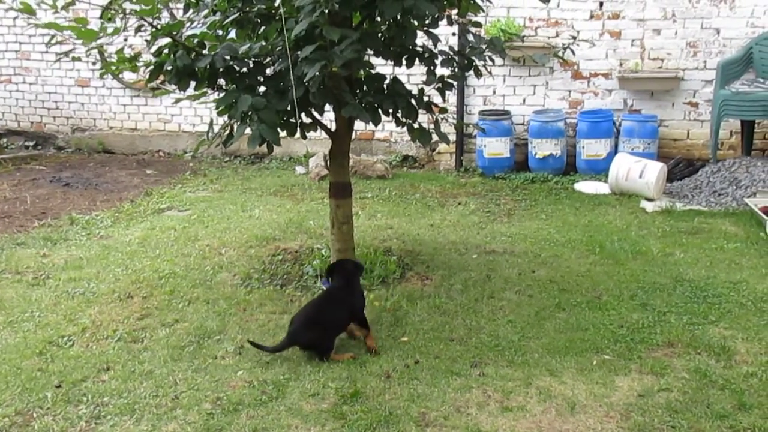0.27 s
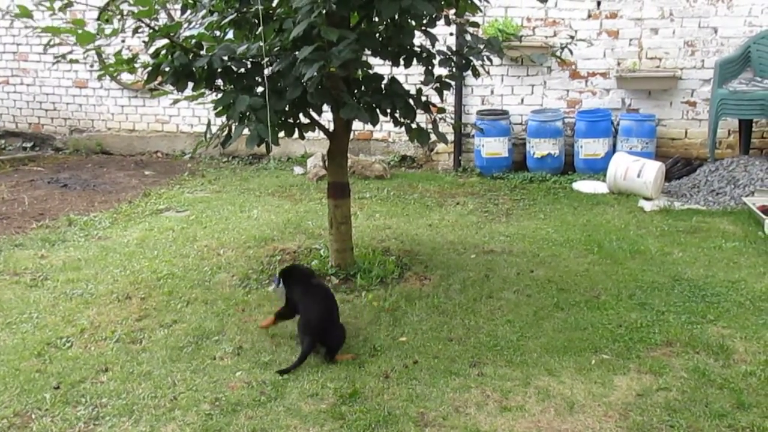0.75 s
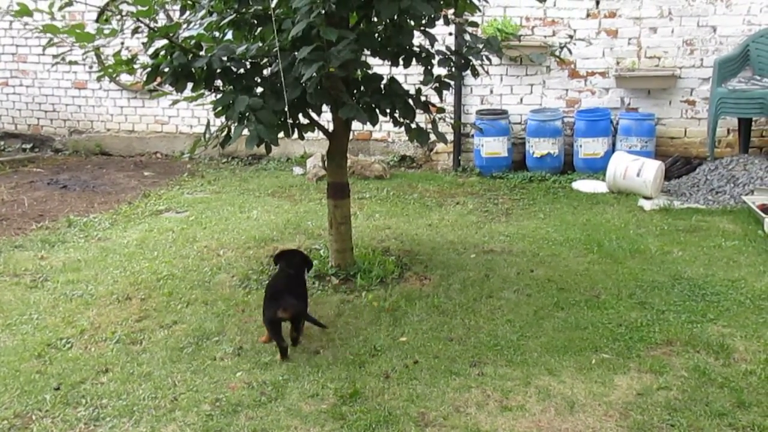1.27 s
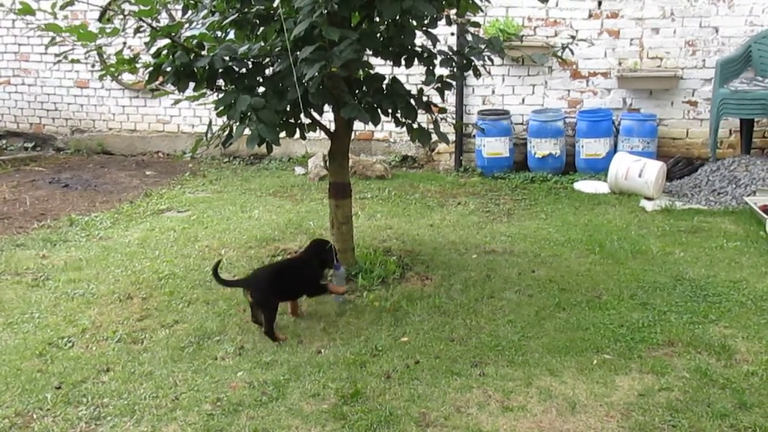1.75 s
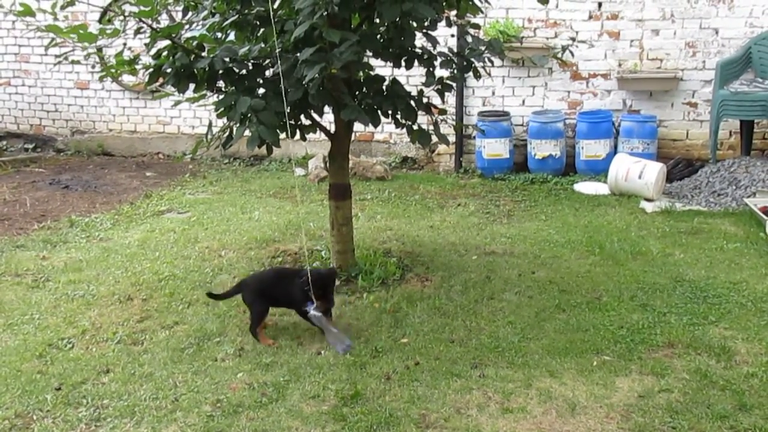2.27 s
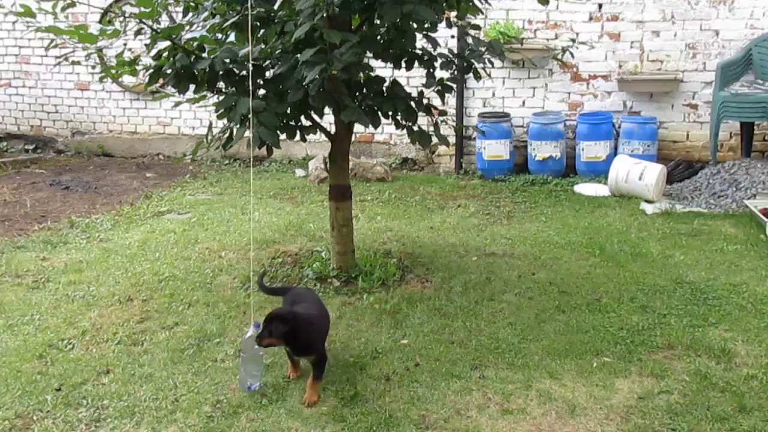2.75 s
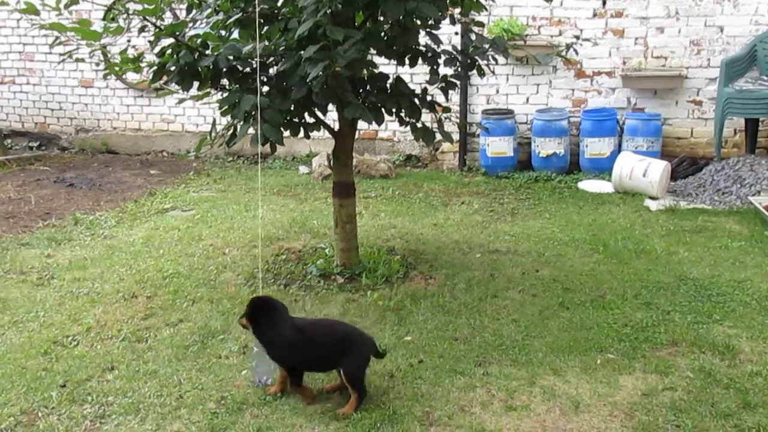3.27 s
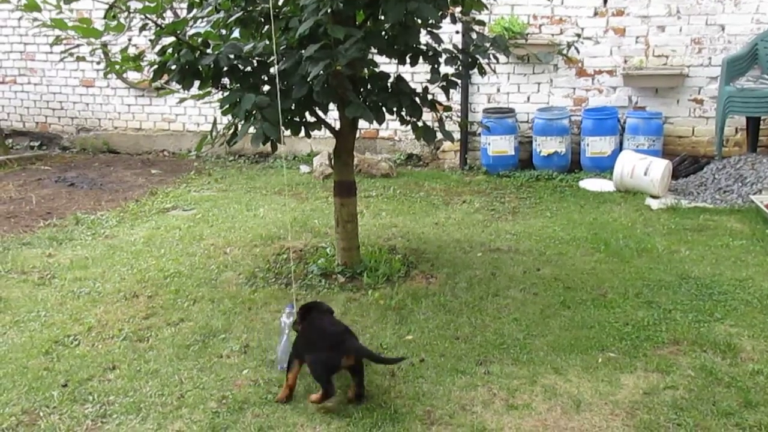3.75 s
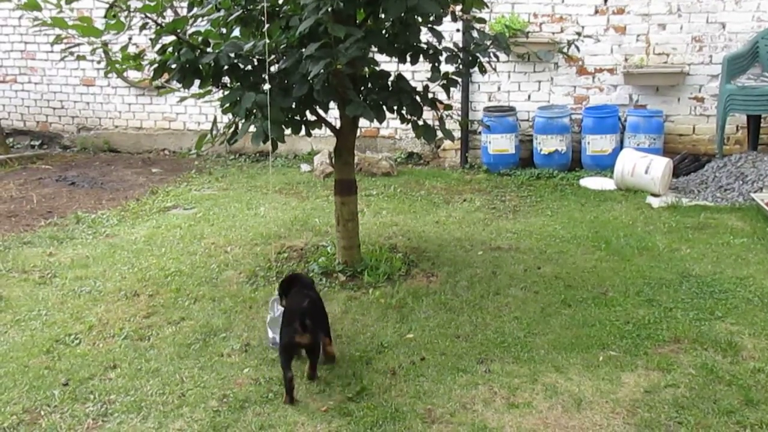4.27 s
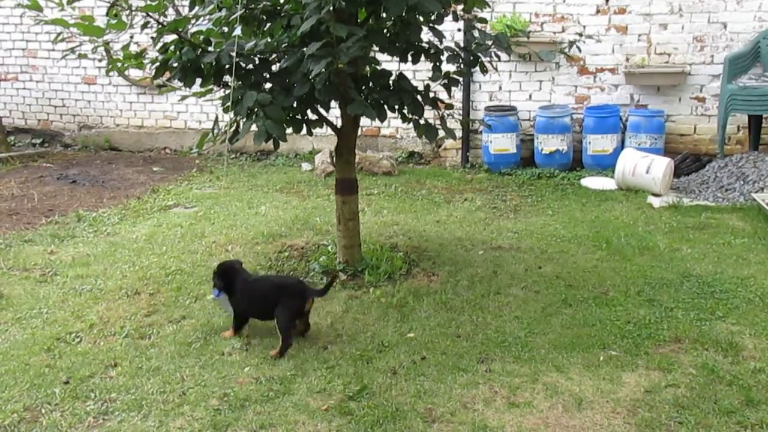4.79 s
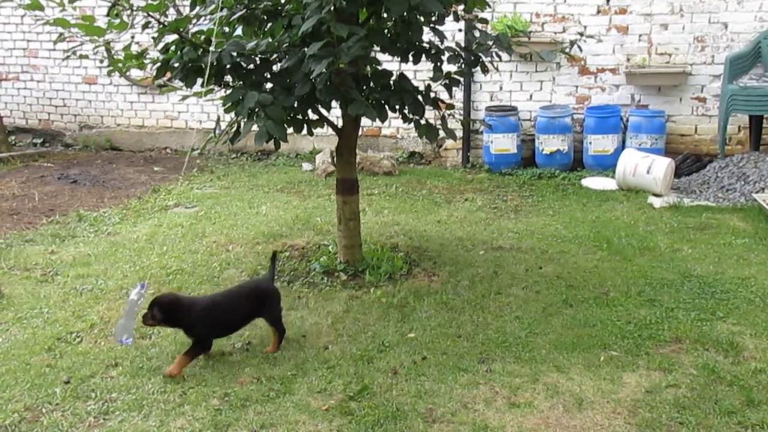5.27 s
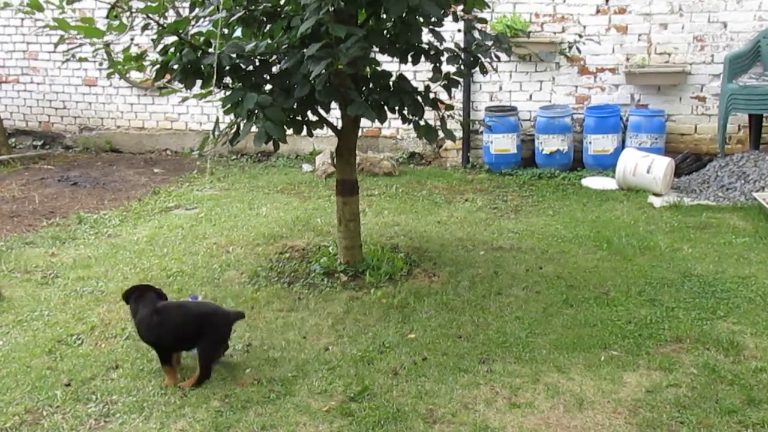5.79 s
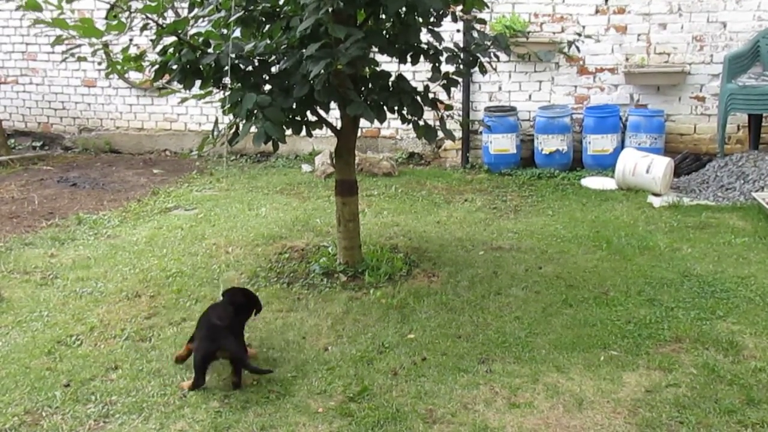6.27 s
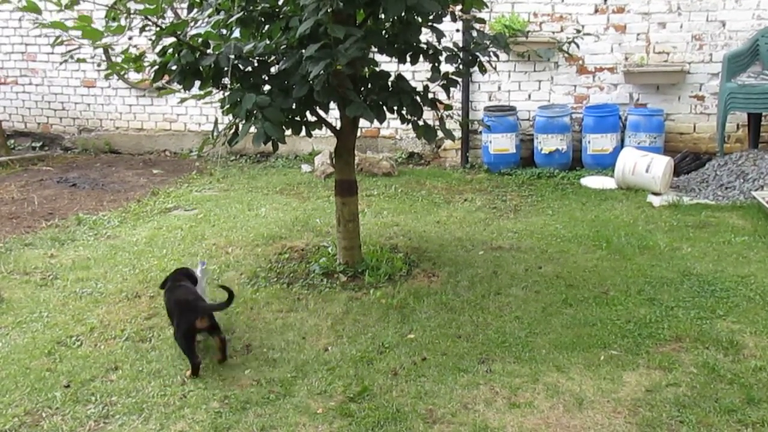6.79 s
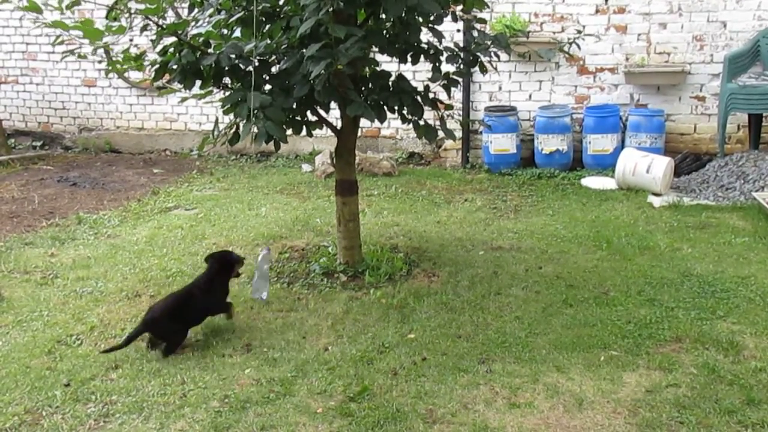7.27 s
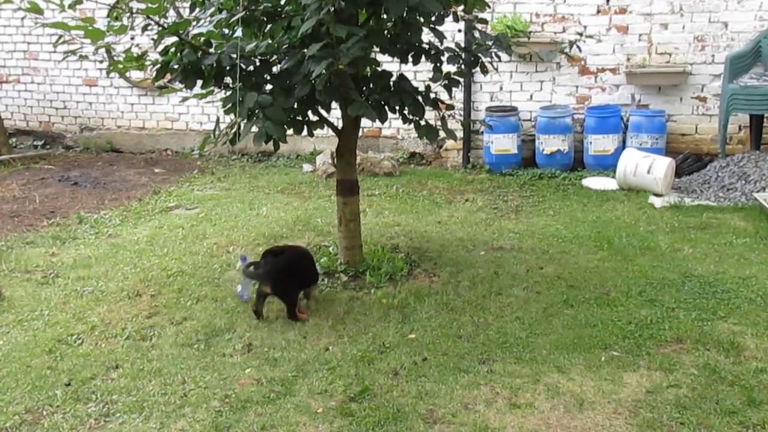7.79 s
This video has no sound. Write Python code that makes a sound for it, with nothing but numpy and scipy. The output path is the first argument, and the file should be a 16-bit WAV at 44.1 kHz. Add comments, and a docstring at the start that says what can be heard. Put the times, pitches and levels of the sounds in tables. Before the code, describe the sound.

A quiet walled yard with far traffic hum and faint leaf hiss, heard through a small stereo camera microphone. From 0 to 0.65 seconds wind buffets in low lumpy thuds, strongest on the right; at about 0.5 a faint bottle tap and plastic crackle. Paws swish grainily through grass throughout. A short low grunt at 1.2, then a bright hollow bottle knock at 1.5. A dry tick at 2.2 leads to another strong, resonant knock at 2.25, another tick at 2.35. A fuller swish and soft low thump come near 2.8, two tiny ticks at 3.07, a double throaty grunt at 3.75. Wind rumbles and thumps from 4 to 5.2, mostly left, over light taps at 4.56. A faint crackle and longer, very low soft grunt come at 5.8. Light knocks at 6.4 and 7.6, with busy swishes and faint wind, carry to the end at 8.

```python
"""On a lawn, a puppy bats at an empty plastic bottle hung from a tree, grunting softly as its paws swish in the grass.
Knocks, dents and ticks excite the bottle's walls and air; grunts are pulses through throat resonances.
Swishes are grainy noise; gusts are lumpy low noise on the two ports of a small camera microphone, with short
low swings for wind eddies and one soft low thump near 2.8 s.
A walled yard returns echoes, with far traffic hum and leaf hiss as filtered noise behind."""
import sys
import numpy as np
from scipy import signal
from scipy.io import wavfile

SR = 44100
rng = np.random.default_rng(int(sys.argv[2]) if len(sys.argv) > 2 else 0)


def persist_wave(psi):
    """Save psi, clipped to +-1, as 16-bit WAV."""
    counts = np.round(np.clip(psi, -1, 1) * 32767).astype(np.int16)
    wavfile.write(sys.argv[1], SR, np.atleast_2d(counts).T)


N = 354563
TIME = np.arange(N) / SR

# Low swings at the ports: wind eddies, and one soft low thump near 2.8 s (two rows). Each row: start in seconds,
# peak in dB before panning, pitch in Hz, left over right in dB.
LOW_SWINGS = [(0.177, -48, 477, -25), (0.178, -20, 73, -29.5), (0.228, -9.5, 111, -32),
              (0.231, -43, 560, -25), (0.239, -12, 83, -30), (0.2575, -20, 546, -29),
              (0.259, -4.5, 276, -42), (0.283, -22, 262, -19), (0.284, -24, 570, -25),
              (0.32, -11.5, 208, -28), (0.3212, -32, 510, -28), (0.325, -22, 90.7, -30),
              (0.369, -46, 600, -25), (0.376, -30, 105, 7), (0.403, -27, 58, -30), (0.493, -22, 112, 17),
              (0.542, -19, 59, 7), (0.592, -10.5, 218, -28), (0.592, -32, 493, -25),
              (0.618, -18, 95.5, -25), (2.804, -35, 318, 22), (2.805, -40, 620, 20), (4.057, -11, 100, 30),
              (4.157, -11.5, 135, 42), (4.146, -18, 228, 28), (4.255, -18, 68.4, 30),
              (4.35, -11.5, 155, 40), (4.404, -22.5, 73.6, 30), (4.556, -18, 91.5, -14),
              (4.63, -18, 64, 28), (4.741, -21, 111.4, 19), (4.742, -15.5, 220, 22), (4.755, -38, 487, 22),
              (4.7573, -35, 890, 22), (4.774, -39, 616, 22), (4.777, -16.5, 98, 24), (4.811, -21, 90, 28),
              (4.849, -16.5, 174, 21), (4.99, -16, 67, 30), (5.069, -13, 114, 40), (5.117, -12.5, 158, -14),
              (6.854, -26, 103, -30), (7.305, -35, 74, -22), (7.741, -21.5, 62, -25)]
PORT_HZ, PORT_WIDTH_HZ, PORT_DB = 8780, 2800, 11   # resonance of the left port


def from_db(db):
    """dB to gain."""
    return 10 ** (np.asarray(db) / 20)


def rms_one(x):
    """Scale to rms 1."""
    return x / np.sqrt(np.mean(x ** 2) + 1e-20)


def at_hz(points, hz):
    """Read a spectrum on a log-frequency axis."""
    points = np.array(points)
    return np.interp(np.log(hz), np.log(points[:, 0]), points[:, 1])


def drift(rate_hz):
    """Slow random curve of rms 1, about rate_hz changes a second: noise through two equal poles."""
    step = 20   # samples between drawn points
    pole = np.exp(-2 * np.pi * rate_hz * step / SR)
    noise = rng.standard_normal(N // step + 2002)
    slow = signal.lfilter([1], [1, -2 * pole, pole * pole], noise)[2000:]   # drop the start-up
    return np.interp(np.arange(N) / step, np.arange(len(slow)), rms_one(slow))


def band_filter(x, hz, kind="band", order=2):
    """Butterworth filter."""
    return signal.sosfilt(signal.butter(order, hz, kind, fs=SR, output="sos"), x)


def ring(clicks, hz, t60_s):
    """Damped mode: a unit click starts a decaying sine of height 1."""
    r, w = from_db(-60 / (t60_s * SR)), 2 * np.pi * hz / SR
    return signal.lfilter([0, np.sin(w)], [1, -2 * r * np.cos(w), r * r], clicks + 1e-18)


def resonate(x, hz, width_hz):
    """Two-pole resonance of gain 1 at its peak."""
    r = np.exp(-np.pi * width_hz / SR)
    zeros = np.array([1, 0, -1]) * (1 - r * r) / 2
    return signal.lfilter(zeros, [1, -2 * r * np.cos(2 * np.pi * hz / SR), r * r], x)


def bands(low_hz, count, source):
    """Centres and half-octave slices of two unrelated sources taken in turn."""
    edges_hz = np.minimum(low_hz * 2 ** (np.arange(count + 1) / 2), .45 * SR)
    for k in range(count):
        centre_hz = np.sqrt(edges_hz[k] * edges_hz[k + 1])
        yield centre_hz, band_filter(source[k % 2], edges_hz[k:k + 2])


def sides(pan_db):
    """Left and right gains that keep their mean power."""
    left = 1 / (1 + from_db(-2 * np.asarray(pan_db)))
    return np.sqrt(2 * np.array([left, 1 - left]))


def alike_pair(pair, hz):
    """Mid and side noise mixed to the likeness of the two ports."""
    # Each row: frequency in Hz, left-right likeness as a ratio.
    likeness = [(60, 1), (290, 0.76), (640, 0.59), (1400, 0.31), (3100, 0.019), (15000, 0.048)]
    alike = np.clip(at_hz(likeness, hz), -1, 1)
    return np.sqrt(1 + alike) * pair[0] + np.sqrt(1 - alike) * pair[1] * [[1], [-1]]


def bottle():
    """Knocks: a crack, a grainy wash of echoes through the thin walls' resonances, and ringing air."""
    # Knocks on the bottle. Each row: time in seconds, snap in dB, edge in dB, crack above the wash in dB,
    # drive of the three air modes in dB, drive of the five wall zones from base to thin top in dB.
    knocks = np.array([(0.477, -57, -54.5, 25.4, -64, -61, -54, -48.5, -64, -47, -49, -51),
                       (1.4925, -32.5, -37.5, 30, -43.5, -33, -53, -42, -43, -41.5, -29.5, -25.5),
                       (2.2488, -35.5, -36, 28.4, -27.5, -38.5, -54, -29.5, -40, -31.5, -25.5, -24.5),
                       (2.374, -62, -66, 30, -55, -49.5, -51.5, -68, -56, -56, -48, -53),
                       (4.021, -76, -69, 19, -46, -39, -45, -40, -52, -50, -44.5, -53),
                       (4.561, -69, -52, 29, -63, -34.5, -29, -47, -37.5, -39, -39.5, -29.5),
                       (4.569, -73, -70, 33, -63, -45, -42, -36, -49, -43, -43, -62),
                       (6.384, -50.5, -55, 26.7, -49, -52, -50, -50, -44.5, -53, -54, -64),
                       (6.442, -48.5, -46.5, 25, -48.5, -43, -42.5, -40, -39.5, -46, -38.5, -31.5),
                       (6.908, -70, -70, 35, -65, -70, -67, -60, -51, -62, -62, -68),
                       (7.572, -53, -65, 15, -78, -54, -46.5, -65, -63, -61, -48, -58),
                       (7.6271, -49.5, -43.5, 24.6, -33.5, -41, -35.5, -57, -46, -47, -47, -39)])
    # Modes of the enclosed air. Each row: frequency in Hz, t60 in seconds.
    air_modes = [(215, 0.15), (389, 0.15), (555, 0.15)]
    # Bands of the sharp snap and the duller edge: low and high limit in Hz.
    snap_hz, edge_hz = [8300, 12100], [5240, 6900]
    # Decay of the wash in each wall zone: t60 in seconds.
    zone_t60_s = [0.18, .22, 0.21, .2, 0.2]
    treble_t60_s, return_db = 0.21, -17.5   # treble wash decay; weakening of the crack's echoes
    rattle_s, rattle_db = 0.0012, -25   # brief wall chatter: time constant, level under the crack
    top_hz, top_db = 12600, -7.5   # weaker top of the snap
    at = np.round(knocks[:, 0] * SR).astype(int)
    crack_above_db = knocks[:, 3]

    def struck(db):
        clicks = np.zeros(N)
        clicks[at] = from_db(db)
        return clicks + 1e-18

    def burst(db, t60_s):
        crack = struck(db + crack_above_db)
        crack = crack + from_db(return_db) * (echoed(crack) - crack)
        wash = signal.lfilter([1], [1, -from_db(-60 / (t60_s * SR))], struck(db))
        wash = wash * from_db(1.5 * drift(73))
        rattle_pole = np.exp(-1 / (rattle_s * SR))
        rattle = signal.lfilter([1], [1, -rattle_pole], struck(db + crack_above_db + rattle_db))
        return crack + (wash + rattle) * alike_pair(rng.standard_normal((2, N)), 820)

    bright = burst(knocks[:, 1], treble_t60_s)
    snap = band_filter(bright, snap_hz) + from_db(top_db) * band_filter(bright, top_hz, "high")
    edge = band_filter(burst(knocks[:, 2], treble_t60_s), edge_hz)
    air = sum(ring(struck(knocks[:, 4 + k]), hz, t60_s) for k, (hz, t60_s) in enumerate(air_modes))
    air = band_filter(echoed(air), [160, 700])   # the air is pushed softly
    zone_drives = [burst(db, t60_s) for db, t60_s in zip(knocks[:, 7:].T, zone_t60_s)]
    return walls(zone_drives) + snap + edge + air


def walls(drives):
    """Thin plastic resonates: each wall mode takes the drive of its zone."""
    # Wall modes. Each row: frequency in Hz, width in Hz, gain in dB.
    wall_modes = [(442, 250, 13), (650, 93, 16.5), (750, 71, 9), (895, 49, 11), (1056, 98, 8),
                  (1283, 83, 10), (1580, 170, 5.5), (1893, 52, 4.5), (2110, 170, 0), (2660, 340, -8),
                  (2716, 55, -0.5), (3120, 670, -8.5), (4730, 1400, -17)]
    # Upper mode frequency of the first four zones in Hz.
    zone_tops_hz = [820, 1200, 1750, 2350]
    out = 0
    for k, (hz, width_hz, db) in enumerate(wall_modes):
        drive = drives[np.searchsorted(zone_tops_hz, hz)]
        out = out + (-1) ** k * from_db(db) * resonate(drive, hz, width_hz)
    return band_filter(out, 6000, "low")


def crumple():
    """Under a paw, uneven little dents pop in and out of the wall."""
    # Each row: start in seconds, length in seconds, drive in dB, crackles per second before clumping.
    crumples = [(0.47, 0.19, -38.5, 440), (5.762, 0.14, -41, 1120)]
    draw = rng.random(N)
    size = from_db(5.1 * np.minimum(rng.exponential(1, N), 2.5)) * rng.choice([-1, 1], N)
    clumps = from_db(8.7 * drift(30))   # dents come in bursts
    pops = 0
    for s, length_s, db, per_s in crumples:
        swell = np.sin(np.pi * np.clip((TIME - s) / length_s, 0, 1)) ** 0.3
        pops = pops + (draw < per_s * clumps / SR) * from_db(db) * swell
    zone_shares = (.2, 0.65, 0.57, 0.95, 1.0)
    return echoed(walls([share * pops * size + 1e-18 for share in zone_shares]))


def ticks():
    """A claw or tooth on the plastic: bare high cracks of fast-decaying noise, no ring."""
    # Each row: time in seconds, drive in dB.
    tick_rows = [(2.181, -38), (2.349, -35), (3.067, -36.5), (3.0713, -38.5)]
    s, db = np.transpose(tick_rows)
    clicks = np.zeros(N)
    clicks[np.round(s * SR).astype(int)] = from_db(db)
    fall_s = 0.00086   # time constant
    crack = signal.lfilter([1], [1, -np.exp(-1 / (fall_s * SR))], clicks + 1e-18)
    return band_filter(crack * rng.choice([-1, 1], N), [7000, 15000])


def echoed(x):
    """The sound and its delayed returns from the wall and the ground."""
    # Each row: delay in seconds, level in dB.
    yard_echoes = [(0.013, -1.5), (0.024, -17), (.041, -9)]
    return x + sum(from_db(db) * np.interp(TIME - s, TIME, x) for s, db in yard_echoes)


def grunts(jitter):
    """Slow uneven pulses of the vocal folds through the throat's resonances."""
    # Each row: start in seconds, length in seconds, drive in dB, mean pulses per second.
    grunt_rows = [(1.222, 0.085, -53.5, 66), (3.745, 0.029, -47.5, 110), (3.783, .09, -48.5, 90),
                  (5.799, 0.34, -60.5, 50)]
    # Throat resonances. Each row: frequency in Hz, width in Hz, gain in dB.
    throat = [(370, 174, 24), (626, 30, 16)]
    effort, rate_hz = np.zeros(N), np.ones(N)
    for s, length_s, db, per_s in grunt_rows:
        inside = (TIME > s) & (TIME < s + length_s)
        effort += inside * from_db(db) * np.abs(np.sin(np.pi * (TIME - s) / length_s)) ** 0.31
        rate_hz[inside] = per_s
    phase = np.cumsum(rate_hz * (1 + jitter * drift(40))) / SR
    pulses = np.diff(np.floor(phase), prepend=0) > 0
    pulses = pulses * from_db(2.0 * rng.standard_normal(N)) * np.sqrt(SR / rate_hz)   # even power at any rate
    voice = pulses * effort + 1e-18
    return sum(from_db(db) * resonate(resonate(voice, hz, width_hz), hz, width_hz)
               for hz, width_hz, db in throat)


def swish(grain_db, hush):
    """Dense fine grains of blades brushing fur and plastic; the top opens with the force of the sweep."""
    # Spectrum. Each row: frequency in Hz, relative level in dB per Hz.
    grass = [(1470, -42), (2500, -3.5), (3460, -1.5), (4800, -5.5), (6250, -3.5), (9890, 0.5), (13800, -6),
             (16000, -10)]
    rustle_db = -67.5   # faint rustle between sweeps
    tilt = 0.2   # dB per octave above PORT_HZ for each dB of force
    grains = rng.standard_normal((2, 2, N)) * from_db(grain_db * rng.exponential(1, N) + 1.5 * drift(5.3))
    level_db = 10 * np.log10(sweeps() + from_db(2 * rustle_db))
    force_db = level_db - level_db.mean()
    out = 0
    for hz, pair in bands(2152, count=6, source=grains):
        opening_db = tilt * force_db * max(np.log2(hz / PORT_HZ), 0)
        out = out + alike_pair(pair, hz) * from_db(at_hz(grass, hz) + 1.86 * drift(22) + opening_db)
    return rms_one(out) * hush * from_db(level_db)


def sweeps():
    """Power of paws and bottle sweeping the grass: about 20 dB per length on either side of each peak."""
    # Each row: peak time in seconds, peak in dB, length in seconds.
    swishes = [(0.163, -60.5, 0.026), (.55, -56.5, 0.073), (0.8, -67, 0.24), (0.964, -61.5, 0.14),
               (1.35, -60, 0.072), (1.426, -57.5, 0.13), (1.964, -58, 0.21), (2.202, -56, 0.16),
               (2.4, -55, 0.24), (2.594, -59, 0.13), (2.71, -56, 0.024), (2.772, -49.5, 0.21),
               (2.99, -60.5, 0.046), (3.203, -51, 0.02), (3.271, -58, 0.33), (3.57, -54.5, 0.079),
               (3.873, -57, 0.33), (4.065, -53.5, 0.1), (4.233, -59.5, 0.075), (4.54, -55.5, 0.16),
               (4.735, -62.5, 0.048), (4.83, -58, 0.25), (4.992, -52.5, 0.062), (5.123, -57.5, 0.077),
               (5.45, -57.5, 0.045), (5.81, -59, 0.089), (6.018, -62, 0.45), (6.291, -54.5, 0.051),
               (6.593, -58, 0.25), (6.905, -58, 0.09), (6.974, -57, 0.13), (7.157, -55.5, 0.18),
               (7.263, -52.5, 0.066), (7.394, -57, 0.03), (7.558, -60, 0.45), (7.692, -56, 0.051),
               (7.815, -53.5, 0.17), (8.02, -60.5, 0.22)]
    rise = 0.53   # share of a sweep spent rising
    power = 0
    for s, db, length_s in swishes:
        away = np.maximum((s - TIME) / rise, (TIME - s) / (1 - rise)) / (2 * length_s)
        power = power + from_db(2 * (db - 20 * np.minimum(away, 5)))
    return power


def wind(lumpy_db, calm_db, swing_db):
    """Turbulence of its own at each port; brighter gusts reach higher, and the rumble comes in lumps."""
    # Plain spectrum. Each row: frequency in Hz, relative level in dB per Hz.
    plain_db = [(12, -33), (20, 11), (38, 4), (81, 4), (123, 3), (229, -5.5), (296, -16), (504, -110),
                (1600, -75), (2080, -88), (3520, -120)]
    usual_bright_db = -10.5   # brightness at which the plain spectrum holds
    rumble_db, bright_db, pan_db = gust_controls(calm_db)
    # the rumble swells around each low swing
    swells = sum(np.exp(-((TIME - s - .008) / 0.012) ** 2) for s, *rest in LOW_SWINGS)
    lumps_db = lumpy_db * np.tanh([drift(33.5), drift(30.5)]) + swing_db * np.minimum(swells, 1)
    out, plain = 0, 0
    for hz, pair in bands(20.06, count=12, source=rng.standard_normal((2, 2, N))):
        band_db = at_hz(plain_db, hz)
        reach = np.clip(np.log2(hz / 110) / 0.85, 0, 2.2)   # only the upper rumble follows the brightness
        plain = plain + pair * from_db(band_db)
        out = out + pair * from_db(band_db + reach * (bright_db - usual_bright_db + 0.88 * lumps_db))
    out = out / plain.std() * from_db(rumble_db + lumps_db) * sides(pan_db)
    return band_filter(out, 800, "low", order=3)   # eddies are too large to hiss


def gust_controls(calm_db):
    """Each puff rises, holds and falls; brightness and side are power-weighted, so the strongest leads."""
    # Puffs of wind on the ports. Each row: start in seconds, length in seconds, rumble in dB before lumps,
    # brightness of the upper rumble in dB, left over right in dB.
    gusts = [(0.0, 0.11, -27, -11.5, -2), (0.096, 0.025, -22.5, -20, 3), (0.168, 0.17, -24.5, -12.5, -9),
             (0.353, 0.097, -36, -7.5, -14), (0.485, 0.15, -28.5, -15.5, -2),
             (0.679, 0.046, -36.5, -16.5, -6), (0.738, 0.05, -44, -44, -15),
             (3.955, 0.085, -35.5, -7.5, -19), (4.009, 0.076, -21.5, -32.5, 7),
             (4.114, 0.15, -24.5, -14, 10), (4.336, 0.061, -20.5, -16.5, 3), (4.463, 0.027, -26.5, -30, 0),
             (4.551, 0.13, -17.5, -19.5, 10), (4.728, 0.13, -22, -16, 10.5),
             (4.87, 0.16, -28.5, -20.5, 1.5), (5.064, 0.088, -23, -17.5, 4), (5.19, 0.058, -39.5, -63, 4),
             (5.368, 0.038, -29, -74, -13), (5.64, 0.0067, -30, -87, 22), (5.705, 0.017, -35.5, -62, -24),
             (5.755, 0.09, -45, -40, -1), (6.871, 0.075, -37.5, -17.5, -3.5), (7.107, 0.13, -48, -35, -5),
             (7.312, 0.11, -46.5, -36, -6), (7.728, 0.21, -33.5, -27.5, -13), (7.965, 0.087, -43.5, -43, 1)]
    rise_db_per_s, fall_db_per_s, calm_bright_db = 589, 416, -18.5
    power = from_db(2 * calm_db) + np.zeros(N)
    bright, pan = power * calm_bright_db, power * 0
    for s, length_s, db, bright_db, pan_db in gusts:
        early, late = np.maximum(s - TIME, 0), np.maximum(TIME - s - length_s, 0)
        puff_db = db - rise_db_per_s * early - fall_db_per_s * late
        puff = from_db(2 * np.maximum(puff_db, -150))
        power, bright, pan = power + puff, bright + puff * bright_db, pan + puff * pan_db
    return 10 * np.log10(power), bright / power, pan / power


def low_swings(cycles):
    """Wind eddies and one soft thump: each row is a short low sine under a smooth hump, panned to a side."""
    out = np.zeros((2, N))
    for s, db, hz, pan_db in LOW_SWINGS:
        t = np.arange(int(cycles / hz * SR)) / SR
        swing = from_db(db) * np.sin(2 * np.pi * hz * t) * np.sin(np.pi * t * hz / cycles) ** 2
        at = round(s * SR)
        out[:, at:at + len(t)] += sides(pan_db)[:, None] * swing
    return out


def yard(patchy_db):
    """Far hum and leaf hiss: noise in bands whose levels drift gently."""
    # Spectrum. Each row: frequency in Hz, relative level in dB per Hz.
    yard_db = [(13, -31), (22, -2.5), (48, 2.5), (70, 1.5), (125, -18), (242, -5), (469, -11.5), (510, -20),
               (554, -13), (690, -18.5), (1200, -16), (2320, -25), (6810, -31), (9480, -36), (16000, -37)]
    out = 0
    for hz, pair in bands(21.3, count=20, source=rng.standard_normal((2, 2, N))):
        out = out + alike_pair(pair, hz) * from_db(at_hz(yard_db, hz) + patchy_db * drift(4.3))
    return rms_one(out) * from_db(-52.5)


def scene():
    """Everything at the two ports; grass and, half as deep in dB, yard dip briefly."""
    # The dip: start in seconds, end in seconds, level in dB.
    start_s, end_s, dip_db = (.265, .475, -10)
    hush = from_db(dip_db * ((TIME > start_s) & (TIME < end_s)))
    low = wind(lumpy_db=5.0, calm_db=-53.5, swing_db=5.5) + low_swings(cycles=2.23)
    background = swish(grain_db=2.5, hush=hush) + np.sqrt(hush) * yard(patchy_db=2.3)
    return low + background + bottle() + ticks() + crumple() + grunts(jitter=0.33)


def record(dry):
    """Left port resonance, bass widening, a notch, a faint whine, rounded peaks and the top cut."""
    widen_db, widen_hz = 5.5, 418   # lift of the left-right difference in the bass
    notch_hz, notch_width_hz = 7870, 91
    whine_hz, whine_db, cutoff_hz = 15734, -85, 15800
    left = dry[0] + (from_db(PORT_DB) - 1) * resonate(dry[0], PORT_HZ, PORT_WIDTH_HZ)
    mid, side = (left + dry[1]) / 2, (left - dry[1]) / 2
    side = side + (from_db(widen_db) - 1) * signal.lfilter(*signal.butter(1, widen_hz, fs=SR), side)
    wide = np.array([mid + side, mid - side])
    notched = wide - resonate(wide, notch_hz, notch_width_hz)
    whining = notched + from_db(whine_db) * np.sin(2 * np.pi * whine_hz * TIME)
    rounded = whining / (1 + whining ** 8) ** (1 / 8)
    return signal.sosfilt(signal.ellip(12, .5, 70, cutoff_hz, fs=SR, output="sos"), rounded)


dry = scene()
out = record(dry)
persist_wave(out)
```